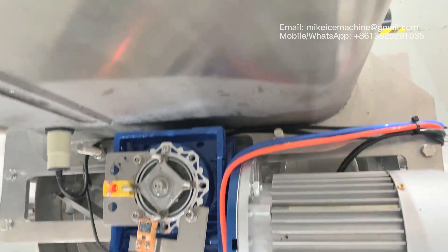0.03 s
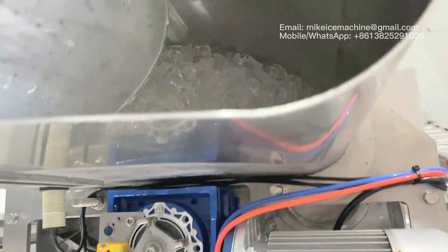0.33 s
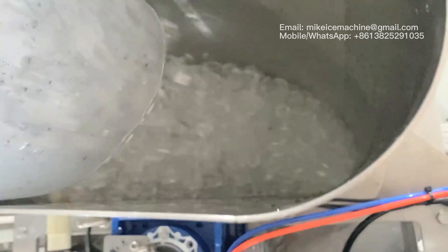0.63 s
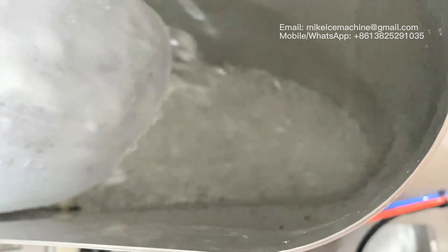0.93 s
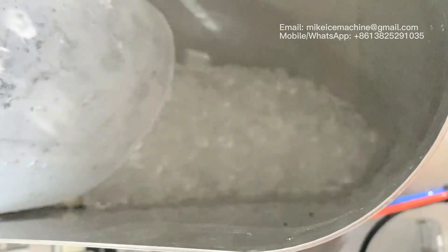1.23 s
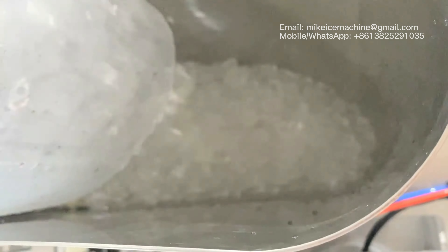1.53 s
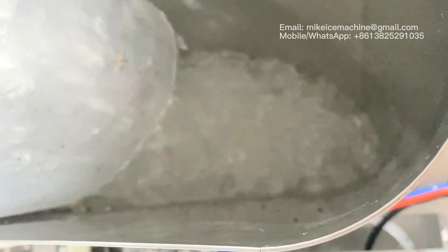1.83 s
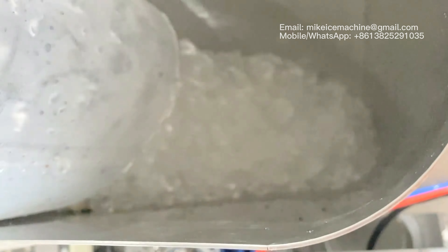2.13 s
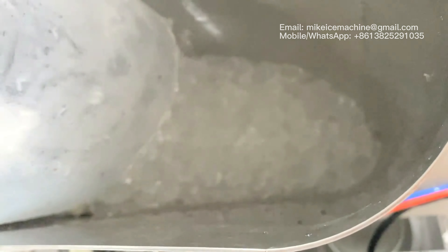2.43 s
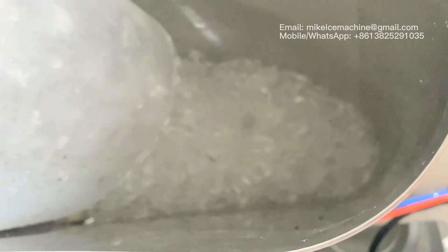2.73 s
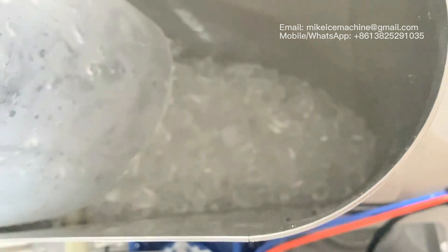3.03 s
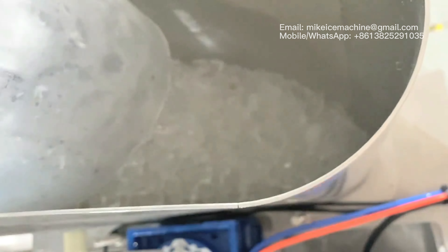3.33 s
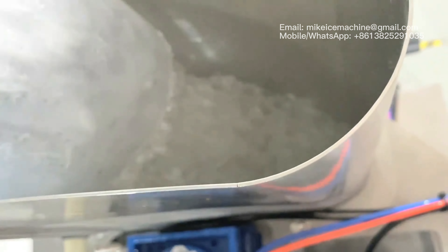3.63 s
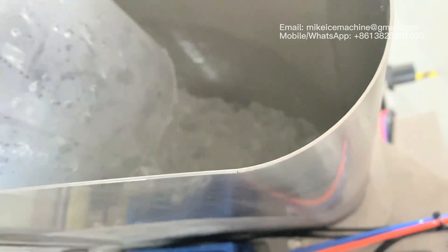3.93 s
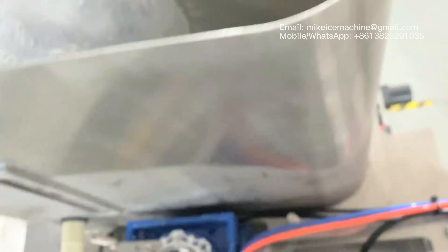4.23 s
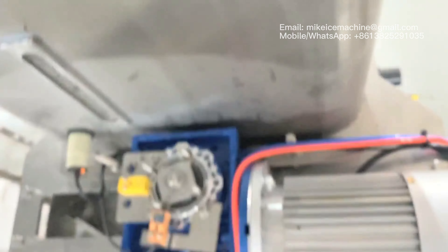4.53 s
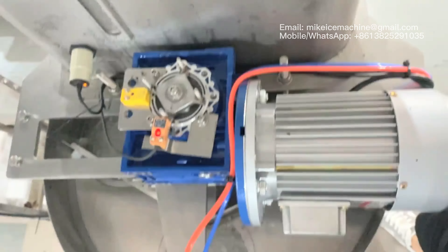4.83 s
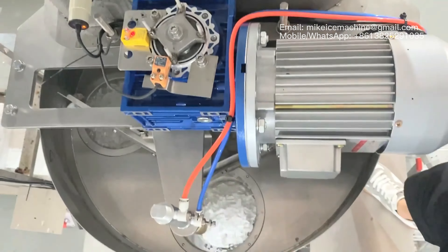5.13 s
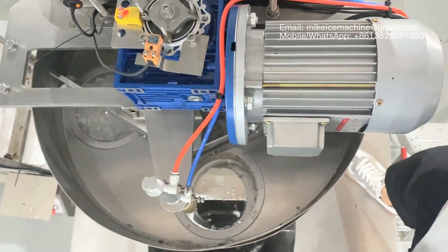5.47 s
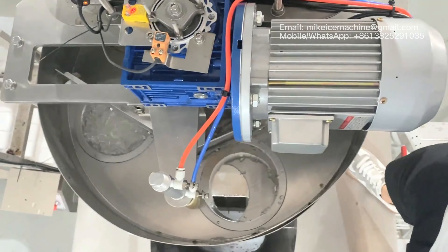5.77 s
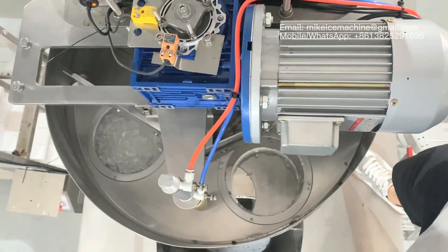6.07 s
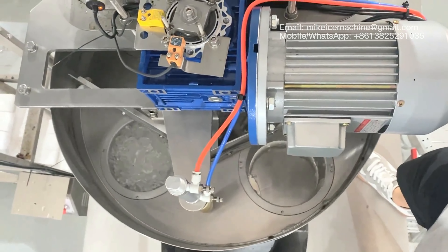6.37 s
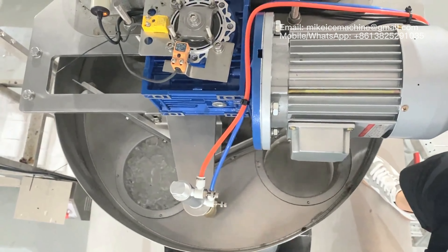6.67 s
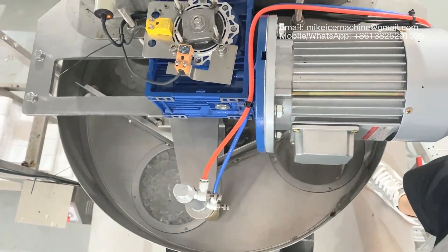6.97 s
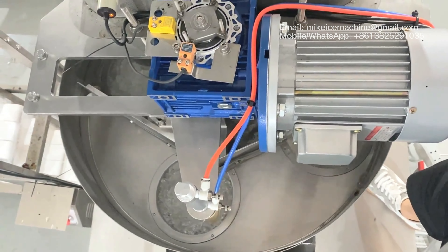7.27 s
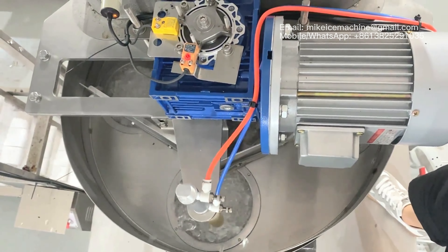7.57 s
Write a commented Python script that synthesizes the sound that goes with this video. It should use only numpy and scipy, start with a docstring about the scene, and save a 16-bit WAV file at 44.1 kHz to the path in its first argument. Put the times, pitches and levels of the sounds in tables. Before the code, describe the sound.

A loud rush of ice cubes and a short metallic groan open the sound, heard close above a steel bin. The ice keeps churning in waves, with glassy clinks, hollow thumps and small squeaks of sticking steel. As the microphone moves down beside the bin, the rattle dies away, leaving a soft scrape, single cubes tapping a metal cup and a motor's quiet hum and high whine.

```python
"""Wet ice cubes rattle as a paddle stirs them in the steel hopper (feed bin) of a packing machine.
The rattle is thousands of tiny touches; clumps break loose, thud on the wall and set the steel ringing.
Ice wedged under the paddle sticks and slips, so the steel groans and squeaks. Later a measuring cup
scrapes and empties, and only stray cubes knock. The geared motor hums and whines underneath.
The microphone hangs over the hopper, then moves down beside it."""
import sys
import numpy as np
from scipy import signal
from scipy.fft import rfft, irfft, next_fast_len
from scipy.io import wavfile
from scipy.ndimage import uniform_filter1d

SR = 44100
rng = np.random.default_rng(int(sys.argv[2]) if len(sys.argv) > 2 else 0)


def transcribe(signal):
    """Save signal, clipped to [-1, 1], as a 16-bit WAV file at the path in sys.argv[1]."""
    frames = np.atleast_2d(signal).T
    limited = np.clip(frames, -1, 1)
    pcm = np.round(limited * 32767).astype(np.int16)
    wavfile.write(sys.argv[1], SR, pcm)


N = 335160
TIME = np.arange(N) / SR
FFT_SIZE = next_fast_len(N + SR, real=True)
HZ = np.maximum(np.arange(FFT_SIZE // 2 + 1) * SR / FFT_SIZE, 1)


def from_db(db):
    """Turn decibels into a number to multiply by."""
    return 10 ** (np.asarray(db) / 20)


def rms_one(x):
    """Scale a signal to an average power of 1."""
    return x / np.sqrt(np.mean(x ** 2) + 1e-20)


def energy_one(x):
    """Scale each row to a total energy of 1."""
    return x / np.sqrt(np.sum(x ** 2, axis=-1, keepdims=True) + 1e-20)


def add(track, start_s, piece):
    """Mix a short sound into a track."""
    at = max(int(start_s * SR), 0)
    track[..., at:at + piece.shape[-1]] += piece[..., :N - at]


def over_time(rows):
    """Join a table's points into one curve over time for each value column."""
    times, *columns = np.transpose(rows)
    return [np.interp(TIME, times, column) for column in columns]


def over_hz(points):
    """Join a table's points into a curve from bass to treble."""
    hz, value = np.transpose(points)
    return np.interp(np.log(HZ), np.log(hz), value)


def coloured(x, colour):
    """Give a sound a colour: its own mix of bass, middle and treble."""
    return irfft(rfft(x, FFT_SIZE) * rms_one(from_db(over_hz(colour))), FFT_SIZE)[..., :N]


def drift(rate_hz):
    """A smooth random wobble with a typical size of 1."""
    spectrum = rfft(rng.standard_normal(FFT_SIZE)) / (1 + (HZ / rate_hz) ** 2)
    return rms_one(irfft(spectrum, FFT_SIZE)[:N])


def dying(t, fade_s):
    """A fade that drops 60 dB in fade_s; all fade times here mean this."""
    return np.exp(-np.log(1000) * t / np.maximum(fade_s, 1e-4))


def swell(length_s):
    """One rounded rise and fall."""
    return np.sin(np.pi * np.arange(int(length_s * SR)) / SR / length_s)


def bursts(times, levels_db, fade_s, rise_s=0.0009, hold_s=0.0038):
    """The strength of sudden bursts that hold for a moment and die away."""
    power, t = np.zeros(N), TIME[:SR // 2]
    shape = np.clip(t / rise_s, 0, 1) * dying(np.maximum(t - hold_s, 0), fade_s)
    for start, level_db in zip(times, levels_db):
        add(power, start, (from_db(level_db) * shape) ** 2)
    return np.sqrt(power)


def contacts(per_s, spread_db, even_s):
    """Random clicks of mixed strength, their power evened out over stretches of even_s."""
    sizes = from_db(spread_db * np.minimum(rng.exponential(1, N), 5)) * rng.choice([-1, 1], N)
    clicks = sizes * (rng.random(N) < per_s / SR)
    local_power = uniform_filter1d(clicks ** 2, int(even_s * SR))
    return clicks / np.sqrt(np.maximum(local_power, 1e-4))


def echoes(t, fade_s):
    """Crowded echoes between steel walls: two channels of fading noise."""
    return energy_one(rng.standard_normal((2, len(t))) * dying(t, fade_s))


def play_clicks(clicks, sounds):
    """Each click sets off one of the sounds, picked by chance."""
    out, pick = np.zeros((2, N)), rng.integers(0, len(sounds), N)
    for at in np.flatnonzero(clicks):
        add(out, at / SR, clicks[at] * sounds[pick[at]])
    return out


def ringing(clicks, notes):
    """A struck object rings at its own notes; each blow wakes each note by a random amount."""
    out, at, luck = 0, np.flatnonzero(clicks), rng.standard_normal((2, N))
    for k, (hz, level_db, fade_s) in enumerate(notes):
        decay, angle = dying(1 / SR, fade_s), 2 * np.pi * hz / SR
        blows = np.full((2, N), 1e-18)
        blows[:, at] = clicks[at] * luck[:, at - k]
        gain = from_db(level_db) * np.sqrt((1 - decay ** 2) / 2)
        out = out + signal.lfilter([gain, 0, -gain], [1, -2 * decay * np.cos(angle), decay ** 2], blows)
    return out


def cubes(clicks, crack_s, ring_cycles, ring_db, echo_s, echo_db, count):
    """Each click hits one of many different-sized cubes: a crack, a glassy ring and echoes."""
    t, sounds = TIME[:SR // 10], []
    for lowest_hz in np.geomspace(1900, 7000, count):
        hz = lowest_hz * np.array([1, rng.uniform(1.312, 1.9), rng.uniform(1.83, 2.26)])[:, None]
        notes = np.sin(2 * np.pi * hz * t) * dying(t, ring_cycles / hz)
        ring = from_db(ring_db) * energy_one(rng.normal(size=(2, len(hz))) @ notes)
        crack = echoes(t, crack_s)
        sounds.append(energy_one(crack + ring + from_db(echo_db) * echoes(t, echo_s)))
    return play_clicks(clicks, sounds)


# Steady stirring, dying down as the heap settles: (time [s], rattle [dB], drumming on the wall [dB])
STIR_LEVELS = [(0, -23.5, -22.5), (.12, -30, -32), (.385, -29.5, -36.5), (.62, -25.5, -39.5),
               (.97, -24, -35.5), (1.05, -26.5, -50), (1.16, -29.5, -41), (1.4, -26.5, -34),
               (1.8, -26, -40), (1.97, -29, -38.5), (2.06, -31.5, -49), (2.19, -30.5, -41.5),
               (2.42, -38.5, -36.5), (2.78, -26, -37), (3.05, -35, -48.5), (3.33, -35.5, -37.5),
               (3.92, -33.5, -46.5), (4.0, -30.5, -38.5), (4.6, -30.5, -40), (4.82, -36, -48),
               (5.1, -37.5, -42.5), (5.42, -33.5, -42), (5.8, -38.5, -47), (6.0, -43.5, -52.5),
               (6.4, -41.5, -47.5), (6.57, -50, -52), (7.0, -52, -59), (7.12, -59, -59)]


def stirring():
    """How strongly the ice flows and presses on the wall, and the motor's load around its average."""
    rattle_db, drum_db = over_time(STIR_LEVELS)
    flow, press = np.hypot(from_db([rattle_db, drum_db]), heaves())
    return flow, press, rattle_db - rattle_db.mean()


def cube_touches(flow):
    """The faster the heap moves, the more often and the harder its cubes touch."""
    per_s = 2000 * np.sqrt(flow / flow.max()) + 400
    return from_db(0.88) * flow * contacts(per_s, spread_db=1.5, even_s=0.02)


# The colour of rattling ice: (frequency [Hz], level [dB])
RATTLE_COLOUR = [(200, -12), (600, 1), (1100, 5), (1700, 2), (2500, -3), (3200, -5.5), (5200, -6.5),
                 (6600, -6.5), (10000, -5), (14000, -7), (16000, -8)]


def rattle(clicks):
    """Many small touches and their echoes blur into a rattle."""
    ice = cubes(clicks, crack_s=0.0022, ring_cycles=320, ring_db=5, echo_s=0.15, echo_db=8.5, count=90)
    return coloured(ice, RATTLE_COLOUR)


# The colour of a hard hit on ice: (frequency [Hz], level [dB])
HARD_HIT_COLOUR = [(200, -22), (700, -9), (1500, 5.5), (2700, 0), (5200, -4), (7000, -7), (12000, -9.5),
                   (16000, -4)]


def knocks(flow):
    """Cubes on top of the heap knock together, hard and dry."""
    clicks = from_db(-9.5) * flow * contacts(per_s=90, spread_db=-1, even_s=0.066)
    ice = cubes(clicks, crack_s=0.008, ring_cycles=60, ring_db=-1, echo_s=0.06, echo_db=-2, count=120)
    return coloured(ice, HARD_HIT_COLOUR)


def thinned(ice, weight_db, below_db=-8.5, body_hz=2040):
    """With little weight behind them only small cubes trickle, so the rattle loses its low part."""
    body = irfft(rfft(ice, FFT_SIZE) / (1 + (HZ / body_hz) ** 4), FFT_SIZE)[:, :N]
    body_gain = from_db(0.58 * np.minimum(weight_db - below_db, 0))
    return ice + body * (body_gain - 1)


# Notes shared by cubes from one mould: (pitch [Hz], level [dB], fade time [s])
CUBE_NOTES = [(2330, -3.5, .05), (2688, -2.5, 0.037), (3075, -3, 0.028), (3365, -3.5, .025),
              (3860, 1, 0.038), (4280, -3, 0.027), (4730, -2, 0.034), (5135, -2.5, 0.027),
              (5330, -6, 0.034)]


def clinks(flow, falling, size_spread=0.03):
    """A cube that bounces clear rings briefly; its size shifts its notes a little."""
    bouncing = np.hypot(from_db(-7) * falling, from_db(-11) * flow)
    clicks = bouncing * contacts(per_s=220, spread_db=0.5, even_s=0.03)
    hz, level_db, fade_s = np.transpose(CUBE_NOTES)[:, :, None]
    t, sounds = TIME[:SR // 16], []
    for _ in range(60):
        own_hz = hz * (1 + size_spread * rng.standard_normal())
        notes = from_db(level_db) * np.sin(2 * np.pi * own_hz * t) * dying(t, fade_s)
        weights = rng.standard_normal((2, len(hz))) * rng.exponential(1, len(hz))  # a few stand out
        sounds.append(energy_one(weights @ notes))
    return play_clicks(clicks, sounds)


# The colour of the wall with ice leaning on it: (frequency [Hz], level [dB])
DULL_WALL_COLOUR = [(90, -23), (180, -12.5), (238, 2.5), (268, 4.5), (320, -10.5), (420, -20), (800, -7),
                    (1200, -15.5), (2000, -25.5), (5000, -78), (16000, -57)]


def wall_drumming(press, thuds):
    """The heap deadens the wall, so each blow gives a dull knock that differs from spot to spot."""
    drumming = from_db(-1) * press * contacts(per_s=450, spread_db=5.5, even_s=0.033)
    spots = [echoes(TIME[:SR // 10], fade_s=0.043) for _ in range(40)]
    return coloured(play_clicks(drumming + thuds, spots), DULL_WALL_COLOUR)


# Notes of the steel hopper: (pitch [Hz], level [dB], fade time [s])
HOPPER_NOTES = [(321.5, -8, 0.13), (361.2, -5.5, 0.24), (385, -8, 0.083), (463.5, -1, 0.038),
                (599.5, -3, 0.024), (711, -4, 0.043), (842, -7, 0.17), (1061, -11, 0.38), (1240, -12, 0.11),
                (1436, -7.5, 0.082), (1556, -9, 0.093), (1756, -6.5, 0.066), (2000, -10, 0.06),
                (2333, -14.5, 0.16)]


def hopper_clang(press, touches, blows):
    """Bare steel rings on when ice presses, rattles or falls against it."""
    clanging = from_db(-2.5) * press * contacts(per_s=700, spread_db=2.5, even_s=0.037)
    return ringing(clanging + blows + from_db(-20) * touches, HOPPER_NOTES)


# Ice and the cup's gate sticking and slipping on steel:
# (time [s], length [s], pitch [Hz], level [dB], wobble [share of pitch], pitch rise [Hz/s])
SLIPS = [(0.0, 0.079, 379, -19.5, 0.0067, -4), (0.066, 0.19, 385, -28, 0.034, 0),
         (0.01, 0.15, 490, -31, 0.06, 2), (0.199, 0.15, 365.7, -28, 0.01, -2),
         (0.482, 0.13, 363, -24, 0.0096, -9), (0.823, 0.11, 364, -32.5, 0.01, -5),
         (1.204, 0.11, 361.5, -24, 0.013, -2), (1.519, 0.16, 362.5, -28, 0.017, -2),
         (2.127, 0.027, 1375, -33, 0.022, -3), (2.25, 0.05, 1370, -35, 0.04, 0),
         (2.477, 0.28, 380, -30.5, 0.027, 4), (2.643, 0.09, 834, -31, 0.0056, -2),
         (4.932, 0.066, 1140, -34.5, 0.1, 0), (4.975, 0.081, 1040, -27.5, 0.053, 197),
         (4.956, 0.13, 448, -33.5, 0.12, 1200), (5.011, 0.023, 1645, -30, 0.032, 0),
         (5.115, 0.081, 383, -30.5, 0.03, -200), (5.169, 0.19, 385, -28, 0.02, 62),
         (5.22, 0.34, 510, -41, 0.02, -2), (5.326, 0.24, 410, -38, 0.053, 2)]


def groans(rough_db=3, overtone_db=-39):
    """Sticking and slipping makes a panel sing; the more its pitch wobbles, the more it rasps."""
    out, wobble, rasp = np.zeros(N), drift(rate_hz=81), drift(rate_hz=170)
    grip = from_db(rough_db * drift(rate_hz=56))
    for start, length, hz, level_db, unsteady, rise in SLIPS:
        shape = swell(length)
        age, now = TIME[:len(shape)], int(start * SR) + np.arange(len(shape))
        pitch = (hz + rise * age) * (1 + unsteady * wobble[now])
        phase = 2 * np.pi * np.cumsum(pitch) / SR
        tone = np.sin(phase) + from_db(overtone_db) * np.sin(2 * phase)
        rasping = 7.4 * unsteady * rasp[now] * np.cos(phase)
        add(out, start, from_db(level_db) * shape * (tone + rasping))
    return out * grip


# The frame shudders as the paddle struggles: (time [s], length [s], level [dB])
FRAME_SHUDDERS = [(0, 0.39, -32), (1.148, 0.11, -35.5), (2.107, 0.099, -36.5), (2.52, 0.063, -34),
                  (3.398, 0.086, -31.5), (4.186, 0.052, -35), (4.462, 0.071, -42), (5.61, 0.16, -42),
                  (6.762, 0.024, -33), (6.84, 0.12, -36)]
# The colour of the shaking frame: (frequency [Hz], level [dB])
FRAME_COLOUR = [(15, -27), (35, -34), (58, -22), (80, 5), (95, -8), (125, 10), (160, 6.5), (210, 2),
                (400, -64), (2000, -60)]


def frame_rumble(load_db):
    """The machine's frame rumbles more as the load grows, and shudders now and then."""
    power = from_db(-48.5 + 0.71 * load_db + 2 * drift(rate_hz=7.3)) ** 2
    for start, length, level_db in FRAME_SHUDDERS:
        add(power, start, (from_db(level_db) * swell(length)) ** 2)
    return np.sqrt(power) * coloured(rng.standard_normal((2, N)), FRAME_COLOUR)


# The colour of the cooling fan's rush of air: (frequency [Hz], level [dB])
AIR_COLOUR = [(40, -14), (150, 4.5), (270, -4.5), (450, -4), (800, -11), (1200, -12.5), (1700, -19),
              (3000, -18.5), (4500, -24), (8000, -25), (16000, -24)]
# The motor's hum and the whine of its drive: (pitch [Hz], level [dB], start time [s], waver [Hz])
MOTOR_TONES = [(58, -60.5, -7, 3.2), (249.4, -53.5, -1.5, 4), (5960, -64, 7.05, 140),
               (8020, -67, 7.05, 130), (11150, -73, 7.05, 120), (11850, -66, 4, 25),
               (12199, -66, 7.05, 7.3)]


def motor(fan_db=-45.5):
    """The motor hums and whines in wavering tones over the rush of its fan."""
    out = from_db(fan_db) * coloured(rng.standard_normal((2, N)), AIR_COLOUR)
    for hz, level_db, start, waver_hz in MOTOR_TONES:
        phase = 2 * np.pi * np.cumsum(hz + waver_hz * drift(rate_hz=38.7)) / SR
        fade_in = np.clip((TIME - start) / 0.041, 0, 1)
        out[0] += from_db(level_db) * np.sqrt(2) * np.sin(phase) * fade_in
    return out


# A clump of cubes breaks loose and lands: (time [s], rattle [dB], wall thud [dB], steel clang [dB])
FALLING_CLUMPS = [(0.099, -27.5, -42, -26.5), (0.139, -15.5, -42, -24), (0.195, -17, -46, -26),
                  (0.216, -17.5, -24.5, -25), (0.262, -15.5, -36, -30.5), (0.288, -19, -33, -41),
                  (0.329, -20, -50, -38), (0.445, -21.5, -24, -28.5), (0.534, -41, -29, -25.5),
                  (0.666, -26, -30, -48), (0.719, -16.5, -30, -29), (0.857, -22, -38, -34),
                  (0.906, -23.5, -52, -28), (0.963, -24, -54, -39), (1.212, -41, -39, -35),
                  (1.262, -38, -20.5, -26), (1.56, -30, -27.5, -37), (1.842, -26.5, -34, -47),
                  (2.075, -32, -52, -40), (2.133, -43, -42, -39), (2.373, -35, -43, -31),
                  (2.439, -21.5, -32.5, -48), (2.64, -25, -31, -29), (2.773, -24.5, -48, -34),
                  (3.044, -31.5, -54, -39), (3.162, -34, -34, -29), (3.256, -22.5, -30, -25),
                  (3.351, -48, -33, -31), (3.383, -30, -50, -38), (3.624, -29, -28.5, -33),
                  (4.034, -21, -24, -26), (4.086, -19.5, -25.5, -34), (4.18, -26.5, -28, -33),
                  (4.277, -38, -39, -39), (4.675, -25, -38, -32.5), (4.86, -46, -45, -38.5),
                  (5.484, -26, -46, -33), (5.617, -26, -43, -36.5), (5.814, -38, -54, -61),
                  (6.427, -30.5, -32.5, -33), (6.655, -35, -35, -46.5), (6.764, -43, -43, -50),
                  (7.52, -29, -53, -34), (7.568, -32.5, -43, -35.5)]


def slumps():
    """Clumps fall: the strength of the fall, then its clicks on ice, deadened wall and bare steel."""
    times, rattle_db, thud_db, clang_db = np.transpose(FALLING_CLUMPS)
    falling = bursts(times, rattle_db, fade_s=0.15)
    thudding = bursts(times, thud_db, fade_s=0.2)
    clanging = bursts(times, clang_db, fade_s=0.092)
    on_ice = from_db(2) * falling * contacts(per_s=3000, spread_db=-2.5, even_s=0.0028)
    on_wall = from_db(1) * thudding * contacts(per_s=1500, spread_db=2, even_s=0.0069)
    on_steel = clanging * contacts(per_s=1500, spread_db=-0.5, even_s=0.0043)
    on_steel[(times * SR).astype(int)] += from_db(clang_db + 15.5)  # one hard blow leads the flurry
    return falling, on_ice, on_wall, on_steel


# A lone cube clacks on the heap: (time [s], level [dB], bass cut-off [Hz])
LONE_CUBES = [(0.196, -6.5, 1500), (0.4065, -20, 2500), (0.4474, -7, 1200), (1.422, -22, 2000),
              (1.842, -11.5, 2000), (2.172, -12.5, 2500), (2.2227, -16, 1500), (3.0874, -15.5, 3500),
              (3.249, -17, 1000), (3.353, -20, 300), (3.384, -18, 3000), (3.551, -13, 1500),
              (3.845, -12.5, 1500), (5.013, -10, 4940), (5.909, -22.5, 3000), (6.428, -23, 400),
              (6.882, -23, 4000), (6.929, -21, 5000), (7.0517, -31.5, 2500)]


def landing_cracks():
    """A clump's first cubes, and lone cubes, land with one dry crack; a small cube has no bass."""
    cracks, t = np.zeros((2, N)), TIME[:SR // 10]
    for start, level_db, *_ in FALLING_CLUMPS:
        add(cracks, start, from_db(level_db + 21) * echoes(t, fade_s=0.019))
    for start, level_db, low_hz in LONE_CUBES:
        bass_cut = signal.butter(2, low_hz, "high", fs=SR, output="sos")
        clack = signal.sosfilt(bass_cut, echoes(t, fade_s=0.026))
        add(cracks, start, from_db(level_db + 15.5) * clack)
    return coloured(cracks, HARD_HIT_COLOUR)


# A heavy lump hits the wall: (time [s], level [dB], pitch [Hz])
LUMP_HITS = [(0.216, -22, 373), (1.263, -13.5, 261), (1.565, -18, 360), (1.683, -15.5, 342),
             (2.643, -16, 264), (3.158, -19.5, 303), (3.254, -19, 260), (3.617, -20, 354),
             (4.054, -20, 274), (4.091, -25, 336), (4.504, -25, 269), (5.628, -25, 252), (6.767, -29, 252)]


def booms(rise_s=0.0071, overtone_ratio=1.73):
    """The wall rings hollow in two low notes; their pitch depends on the spot that is hit."""
    out, t = np.zeros(N), TIME[:SR // 2]
    shape = np.clip(t / rise_s, 0, 1) * dying(t, fade_s=0.13)
    for start, level_db, hz in LUMP_HITS:
        phase = 2 * np.pi * hz * t
        tone = np.sin(phase) + from_db(-14.5) * np.sin(overtone_ratio * phase)
        add(out, start, from_db(level_db - 3) * shape * tone)
    return out


# The paddle lifts the heap, or more ice pours on: (time [s], length [s], rattle [dB], drumming [dB])
HEAP_PUSHES = [(0.459, 0.093, -18, -30), (0.626, 0.16, -23, -36), (1.192, 0.097, -20.5, -29.5),
               (1.499, 0.037, -25, -35), (1.625, 0.12, -26.5, -35), (2.212, 0.032, -25, -29.5),
               (2.292, 0.04, -25, -33), (2.472, 0.062, -21, -36), (2.593, 0.096, -21, -35),
               (2.869, 0.047, -27.5, -46), (3.128, 0.031, -26.5, -41), (3.384, 0.13, -26.5, -36.5),
               (3.53, 0.17, -26, -35), (3.785, 0.059, -28.5, -39), (4.044, 0.038, -19.5, -28.5),
               (4.12, 0.021, -24, -33), (4.272, 0.098, -28, -41), (4.446, 0.1, -30.5, -37.5),
               (5.135, 0.22, -29.5, -57), (5.458, 0.074, -28, -41.5), (5.627, 0.07, -35, -39),
               (6.673, 0.27, -50, -51.5)]


def heaves(rise_s=0.015, growth_db=0.5):
    """The extra strength of rattle and drumming as each push sets in, grows a little and runs out."""
    power, t = np.zeros((2, N)), TIME[:SR]
    for start, length, rattle_db, drum_db in HEAP_PUSHES:
        build = np.clip(t / rise_s, 0, 1) * from_db(growth_db * np.minimum(t / length - 1, 0))
        shape = build * dying(np.maximum(t - length, 0), fade_s=0.28)
        add(power, start, (from_db([[rattle_db], [drum_db]]) * shape) ** 2)
    return np.sqrt(power)


# Notes of ice scraping the plate under the cup: (pitch [Hz], level [dB], fade time [s])
SCRAPE_NOTES = [(5560, -4, .025), (7400, -5, 0.013), (7620, -6, .012), (8150, -9, .012)]


def scrape(start_s=5.85, length_s=1.15):
    """The full cup drags its ice over the plate in tiny, bright slips."""
    drag = np.sin(np.pi * np.clip((TIME - start_s) / length_s, 0, 1))
    slips = contacts(per_s=900, spread_db=5, even_s=0.055)
    return from_db(-55) * drag * ringing(slips, SCRAPE_NOTES)


# The measuring cup clacks against its stop: (time [s], level [dB])
CUP_STOPS = [(6.429, -42), (7.523, -37), (7.573, -43)]
# Notes of the cup: (pitch [Hz], level [dB], fade time [s])
CUP_NOTES = [(356, 2, .2), (864, -4, .18), (3000, 0, 0.11), (3448, 0, .14), (4718, -3, .12)]


def cup():
    """The steel cup rings briefly at each hit."""
    out, t = np.zeros(N), TIME[:SR // 2]
    ring = sum(from_db(db) * np.sin(2 * np.pi * hz * t) * dying(t, fade) for hz, db, fade in CUP_NOTES)
    for start, level_db in CUP_STOPS:
        add(out, start, from_db(level_db) * ring)
    return out


# The hopper as the microphone moves: (time [s], left minus right [dB], muffling of the ice [dB])
MICROPHONE_PATH = [(0, -0.5, 2), (.33, -6.5, -4.5), (.6, -10, -5), (3.6, -6.5, -5.5), (4.4, -7.5, -3),
                   (5.3, -1, 3), (6.2, -3, -3), (7.6, -4.5, -1.5)]


def moving_microphone(ice, corner_hz=1900):
    """The ice, duller when the wall hides it and brighter when not, and the hopper's left-right gains."""
    pan_db, muffle_db = over_time(MICROPHONE_PATH)
    low = signal.sosfilt(signal.butter(1, corner_hz, fs=SR, output="sos"), ice)
    heard_ice = low * from_db(muffle_db) + (ice - low) * from_db(-muffle_db / 2)
    return heard_ice, from_db(pan_db * [[.5], [-.5]])


# How alike the microphone's two openings sound: (frequency [Hz], likeness [0-1])
SIDE_LIKENESS = [(60, 1), (170, 1), (400, 0.49), (750, 0.19), (1200, 0.1), (1900, 0.14), (2500, 0.56),
                 (6000, 0.44), (8000, 0.69), (9000, 1), (10300, 0.72), (12300, 0.63), (13700, 0.78),
                 (15000, 0.98)]
# Which opening is louder: (frequency [Hz], left minus right [dB])
SIDE_BALANCE = [(100, -1.5), (480, 4.5), (850, -2.5), (1300, 2), (2200, 0.5), (3200, -5.5), (5500, -4.5),
                (7500, -0.5), (15000, 0)]
# How far the left wave trails the right: (frequency [Hz], lag [radians])
SIDE_LAG = [(100, 0), (260, .35), (450, .9), (700, 2.8), (1300, 3.2), (2400, 6.3), (3100, 7), (4300, 6.7),
            (5500, 7.4), (6800, 6.2), (8800, 3.25), (9400, 3.05), (11700, .1), (13000, -.2), (14900, -3.1)]


def stereo(sound):
    """Row 0 reaches both openings alike, row 1 with opposite signs; each side has its level and lag."""
    shared, opposed = rfft(sound, FFT_SIZE)
    alike = np.clip(over_hz(SIDE_LIKENESS), 0, .99)
    pair = np.sqrt((1 + alike) / 2) * shared + np.sqrt((1 - alike) / 2) * opposed * [[1], [-1]]
    balance = from_db(over_hz(SIDE_BALANCE) * [[.5], [-.5]])
    lag = np.exp(-1j * over_hz(SIDE_LAG) * [[.5], [-.5]])
    return irfft(pair * balance * lag, FFT_SIZE)[:, :N]


def scene():
    """Mix the rattling ice, the drumming and groaning hopper, the motor and the cup."""
    flow, press, load_db = stirring()
    touches = cube_touches(flow)
    falling, on_ice, on_wall, on_steel = slumps()
    ice = rattle(touches + on_ice) + knocks(flow)
    ice = thinned(ice, weight_db=20 * np.log10(press / flow))
    ice, pan = moving_microphone(ice + clinks(flow, falling) + landing_cracks())
    hopper = wall_drumming(press, on_wall) + hopper_clang(press, touches, on_steel)
    steel = stereo(hopper) + groans() + booms() + cup()
    machine = frame_rumble(load_db) + motor()
    return stereo(ice + machine + scrape()) + pan * steel


def record(dry):
    """Cut the very highest treble steeply, above 15700 Hz."""
    return signal.sosfilt(signal.ellip(12, .1, 90, 15700, fs=SR, output="sos"), dry)


dry = scene()
out = record(dry)
transcribe(out)
```